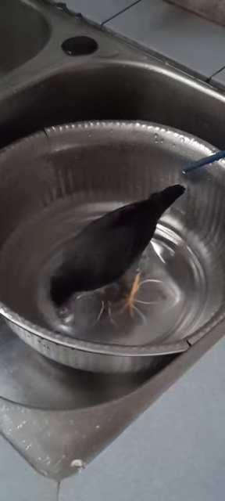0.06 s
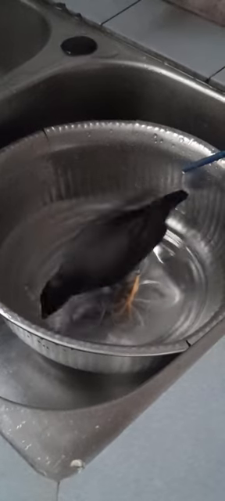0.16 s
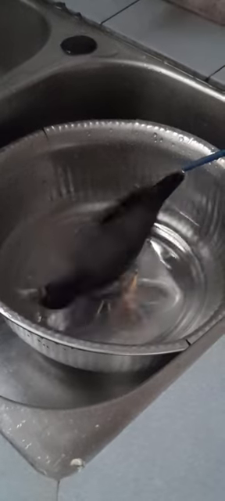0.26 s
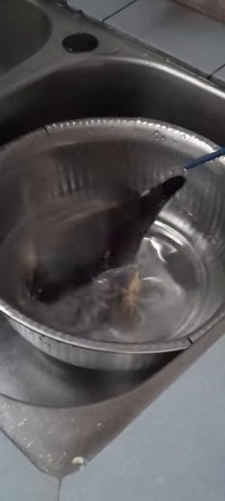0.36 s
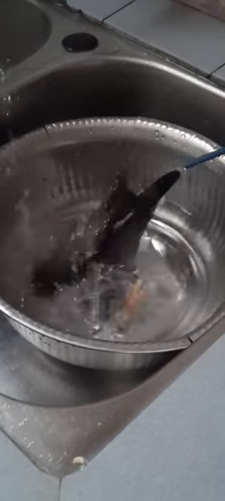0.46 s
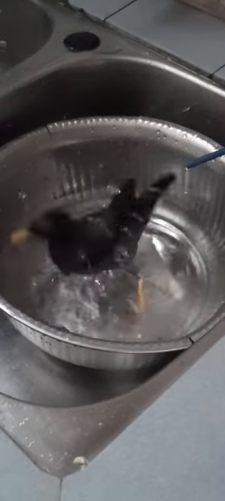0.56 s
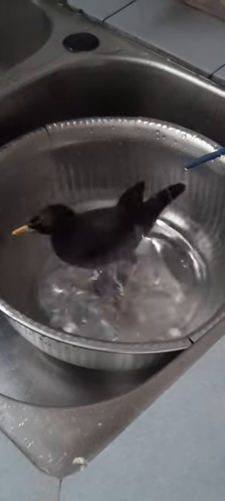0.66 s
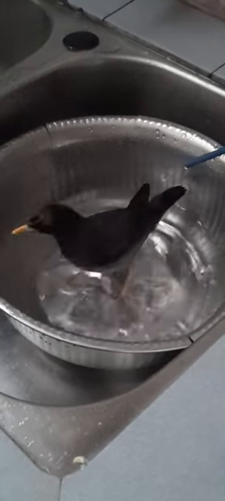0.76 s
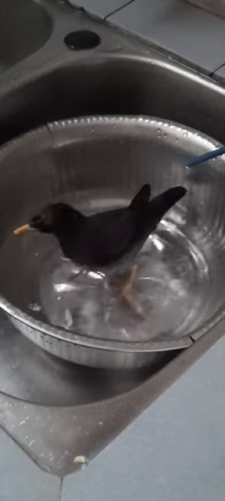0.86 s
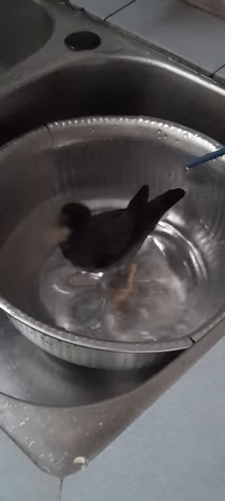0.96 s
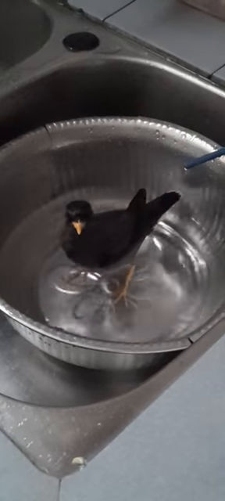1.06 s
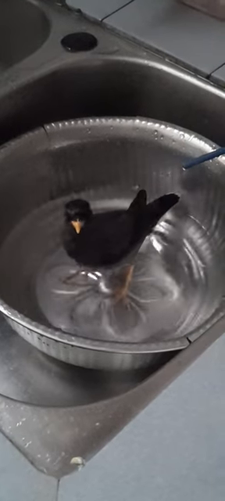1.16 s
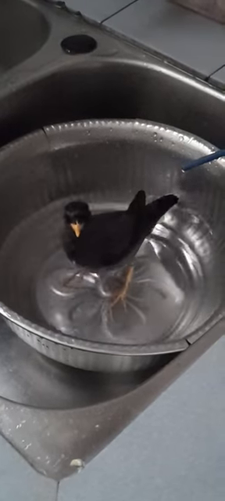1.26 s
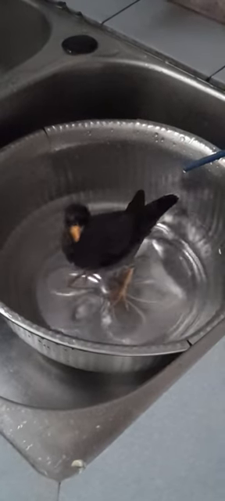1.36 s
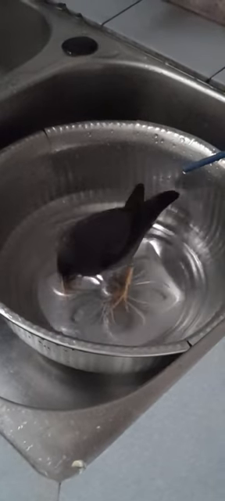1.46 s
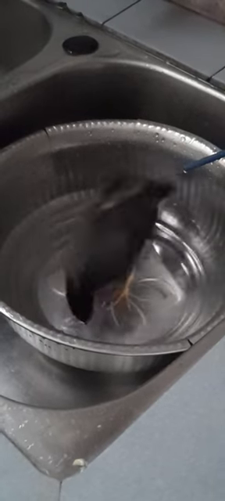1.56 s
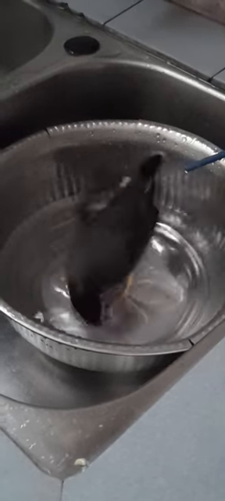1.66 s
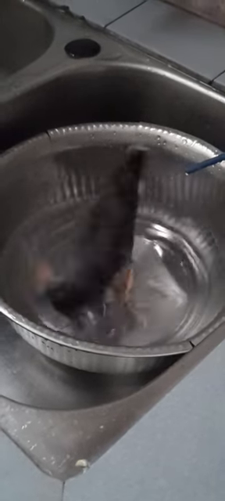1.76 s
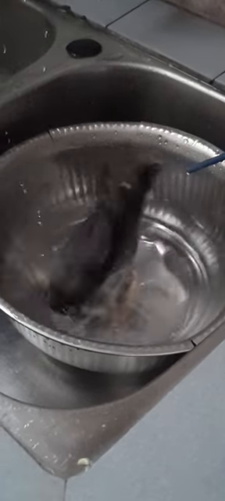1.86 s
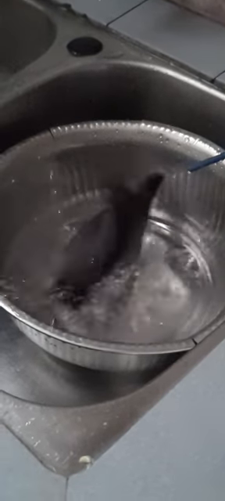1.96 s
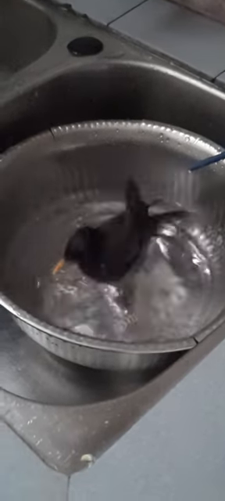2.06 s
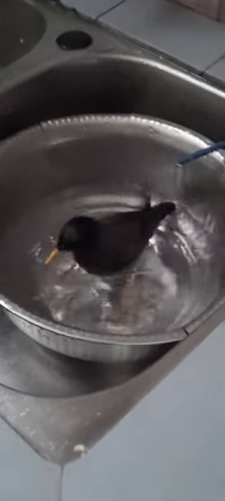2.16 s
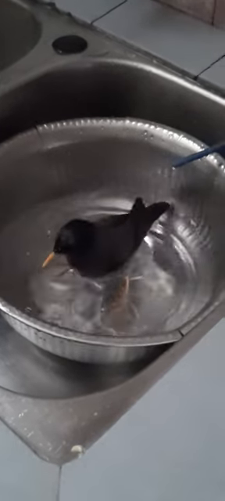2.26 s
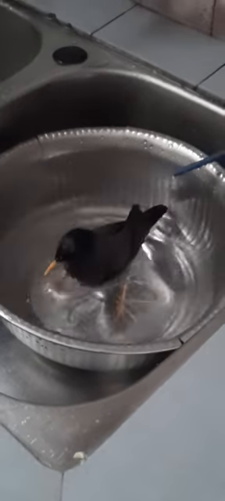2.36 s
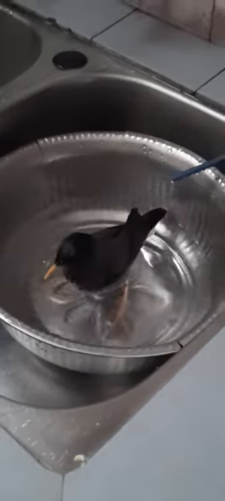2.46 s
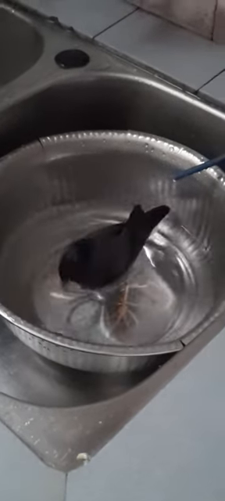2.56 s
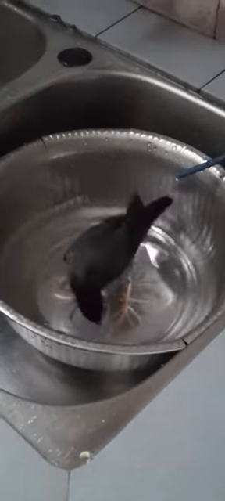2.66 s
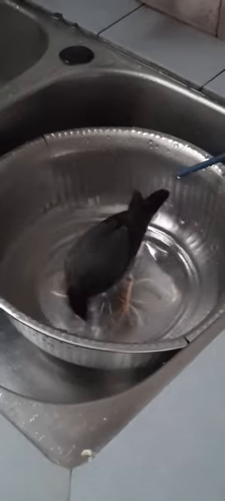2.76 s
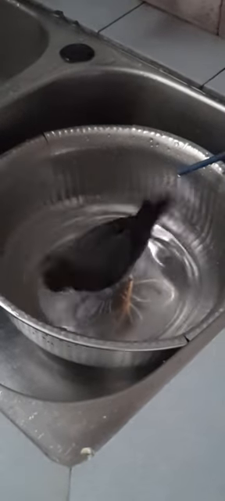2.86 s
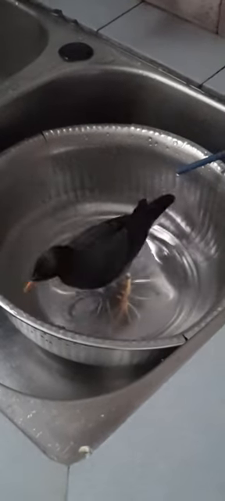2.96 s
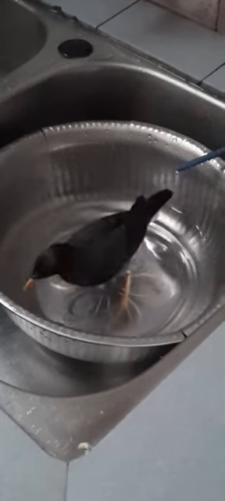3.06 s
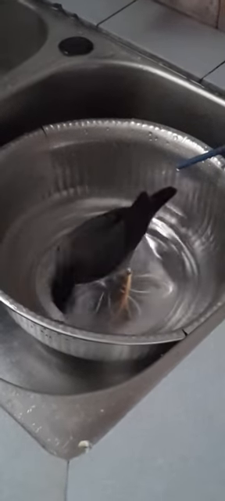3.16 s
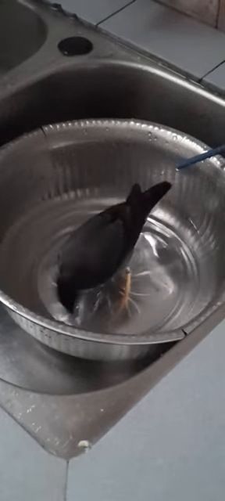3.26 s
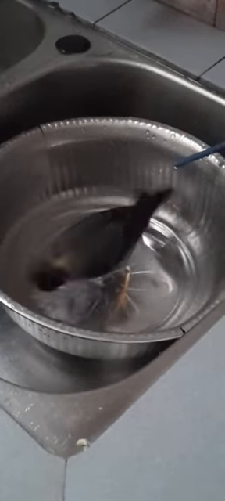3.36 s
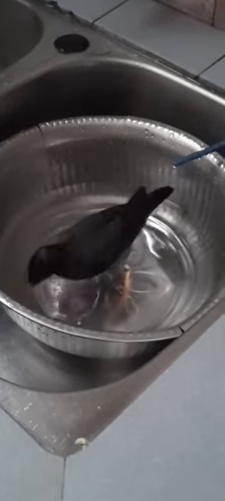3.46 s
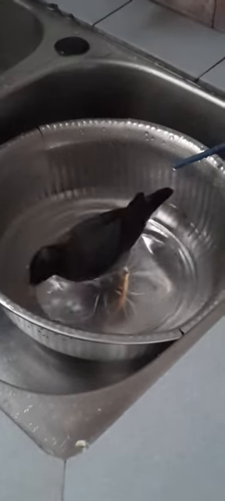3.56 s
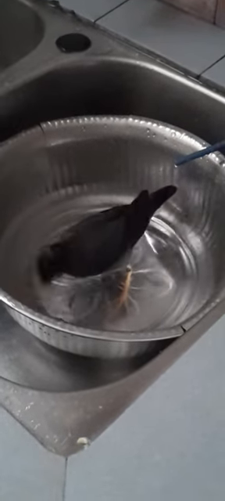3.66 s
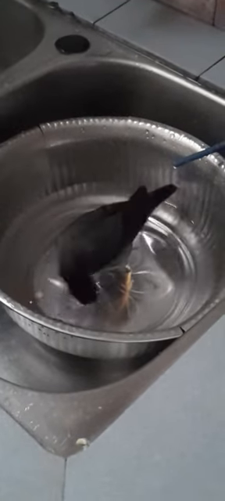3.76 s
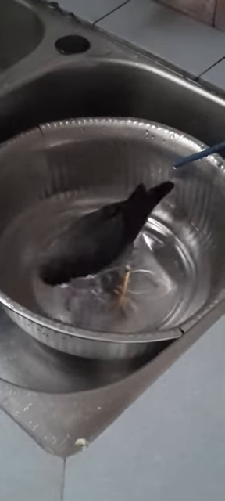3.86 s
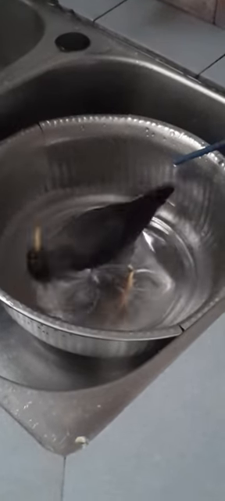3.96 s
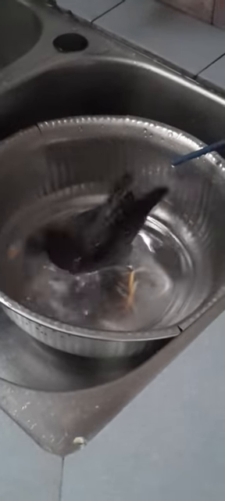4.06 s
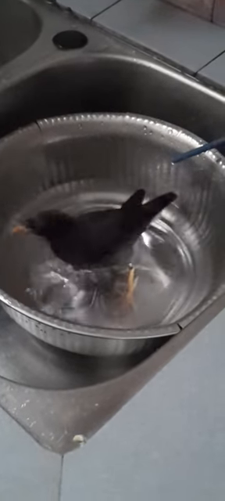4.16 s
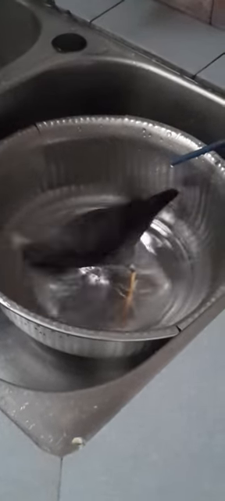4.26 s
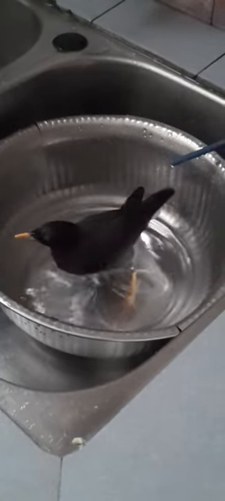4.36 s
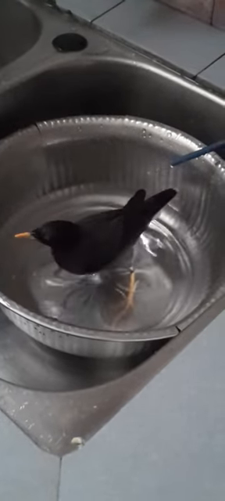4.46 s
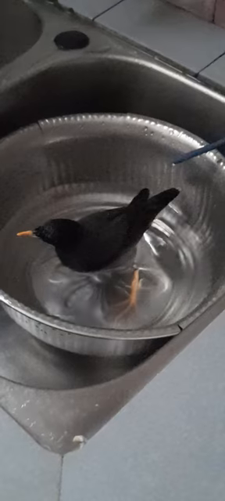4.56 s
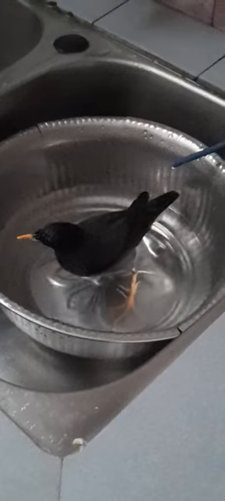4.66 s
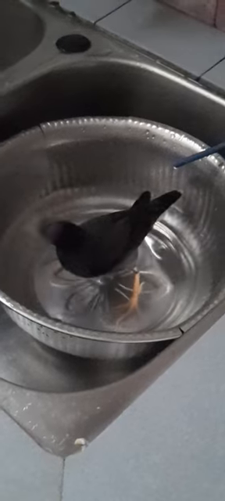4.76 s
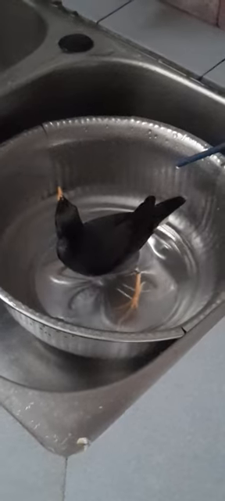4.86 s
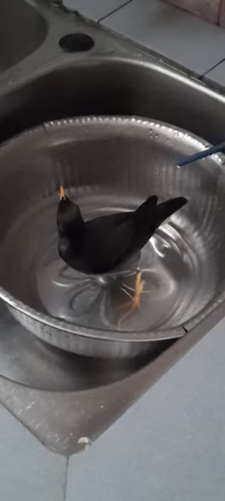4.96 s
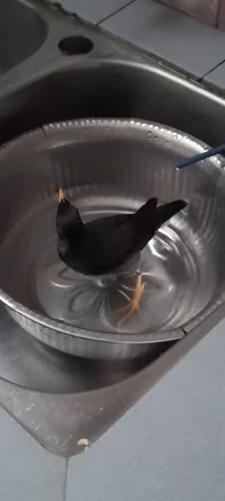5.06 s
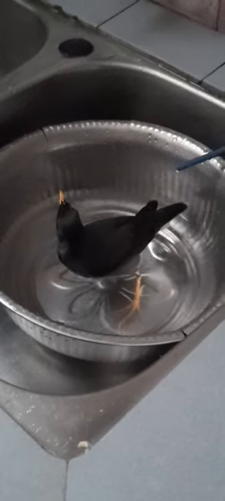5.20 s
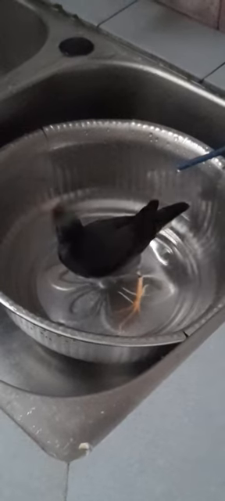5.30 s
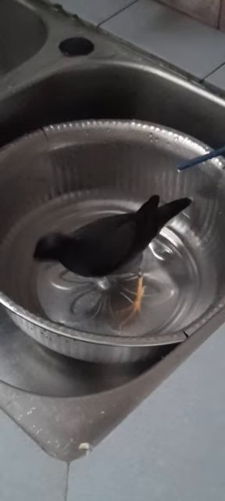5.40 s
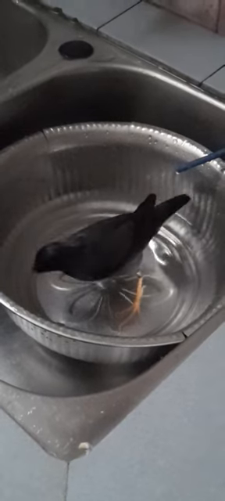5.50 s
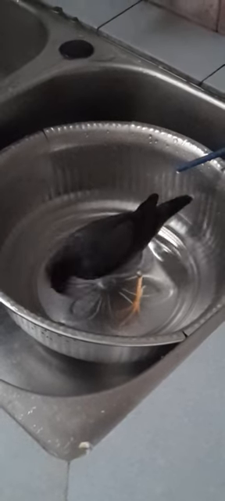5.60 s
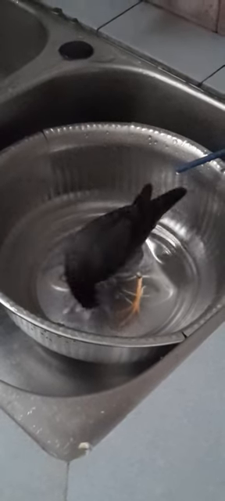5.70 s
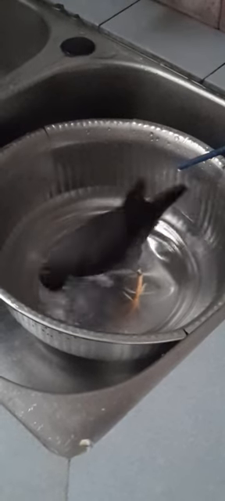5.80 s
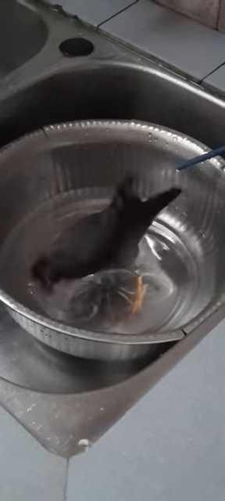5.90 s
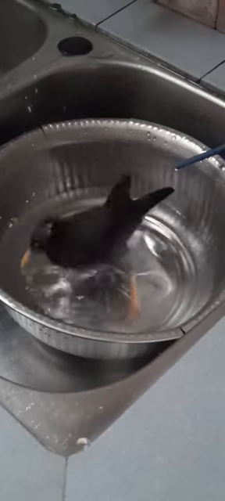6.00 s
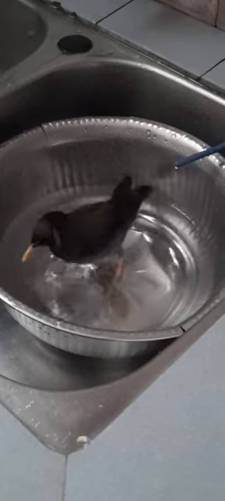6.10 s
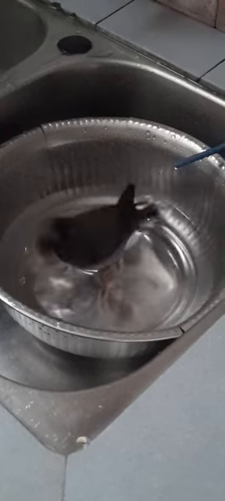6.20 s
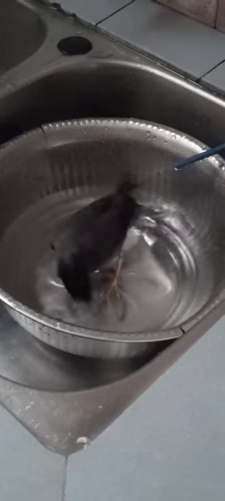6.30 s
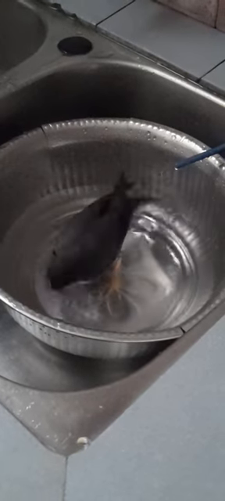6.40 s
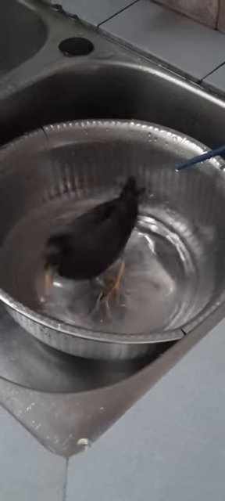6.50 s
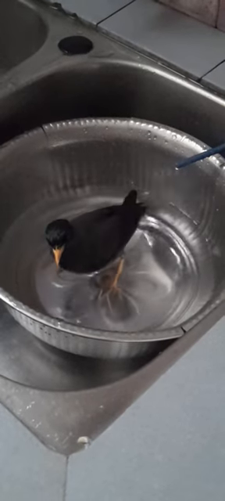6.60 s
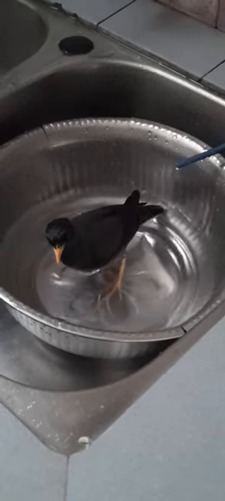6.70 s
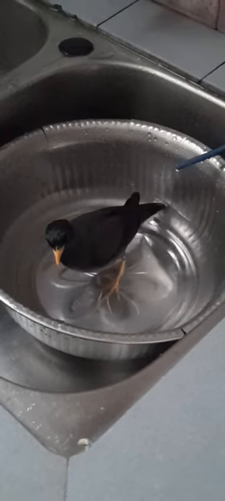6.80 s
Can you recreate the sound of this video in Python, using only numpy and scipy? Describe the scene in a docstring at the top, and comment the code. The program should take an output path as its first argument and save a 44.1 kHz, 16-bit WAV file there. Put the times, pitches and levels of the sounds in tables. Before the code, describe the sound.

A small bird bathes in a metal basin of shallow water, wings slapping in short splashy bursts with spray and gurgles over a faint low hum.

```python
"""A small bird bathes in shallow water in a metal basin in a kitchen sink, heard on two close microphones.
Its wings slap the water about 23 times a second in short bouts: bursts of noise with a ringing cavity.
Low noise puffs are the air they push; damped sines make the spray, the gurgling churn and the plops.
Noise tails rattle in the basin and echo in the tiled kitchen, over wavering hum tones and a rush of air."""
import sys
import numpy as np
from scipy import signal
from scipy.fft import rfft, irfft
from scipy.io import wavfile
from scipy.ndimage import uniform_filter1d

SR = 44100
rng = np.random.default_rng(int(sys.argv[2]) if len(sys.argv) > 2 else 0)


def log_audio(samples):
    """Write samples as a 16-bit WAV file to the path given in sys.argv[1]."""
    # one column per channel
    frames = np.atleast_2d(samples).T
    # limit to full scale, then quantise
    limited = np.clip(frames, -1, 1)
    pcm = np.round(limited * 32767).astype(np.int16)
    wavfile.write(sys.argv[1], SR, pcm)


N = 301644
TIME = np.arange(N) / SR

# mean lag of the splashes at the right microphone (s), and the recorder's upper band edge (Hz)
RIGHT_LAG_S, EDGE_HZ = 0.00009, 16300


def amp(db):
    """Decibels to gain."""
    return 10 ** (np.asarray(db) / 20)


def unit(x):
    """Scales to an rms of one."""
    return x / np.sqrt(np.mean(x ** 2) + 1e-20)


def read(points, hz):
    """Reads a table on a log-frequency axis."""
    f, value = np.transpose(points)
    return np.interp(np.log(hz + 1), np.log(f + 1), value)


def add(mix, s, sound):
    """Mixes a sound in at a given time in seconds."""
    part = mix[max(round(s * SR), 0):][:len(sound)]
    part += sound[:len(part)]


def drift(rate_hz):
    """Slow random motion of rms one."""
    hz = np.fft.rfftfreq(N, 1 / SR)
    return unit(irfft(rfft(rng.standard_normal(N)) * np.exp(-(hz / rate_hz) ** 2), N))


def colour(x, points, size=4096):
    """Causal (minimum-phase) filter of unit energy with the given spectrum."""
    log_gain = np.log(amp(read(points, abs(np.fft.fftfreq(size, 1 / SR)))))
    taps = np.fft.ifft(np.exp(np.conj(signal.hilbert(log_gain)))).real
    return signal.oaconvolve(x, taps / np.linalg.norm(taps))[:N]


# Likeness of the two microphones. Each row: frequency in Hz, correlation.
MIC_LIKENESS = [(30,0.46),(90,0.73),(200,0.94),(400,0.62),(900,0.052)]


def pair(x):
    """Makes two unrelated channels alike in the bass, as at two close microphones."""
    spectra, hz = rfft(x), np.fft.rfftfreq(x.shape[1], 1 / SR)
    angle = np.arcsin(np.clip(read(MIC_LIKENESS, hz), -1, 1)) / 2
    return irfft(spectra * np.cos(angle) + spectra[::-1] * np.sin(angle), x.shape[1])


def stereo(source):
    """Two draws of a random source, made alike in the bass."""
    return pair(np.array([source(), source()]))


# Spectrum of the rush of air. Each row: frequency in Hz, relative density in dB per Hz.
RUSH_COLOUR = [(20,-34),(55,-1.5),(90,1),(120,3),(200,-10),(320,0),(440,-10),(680,-13.5),(1200,-21),(3200,-37.5),(6000,-32),(8500,-39),(12500,-35),(16000,-38.5)]
# Lean of the rush across the microphones. Each row: frequency in Hz, left minus right in dB.
RUSH_LEAN = [(100,0.5),(300,-2.5),(700,-0.5),(2000,0)]
# Appliance hum. Each row: frequency in Hz, relative level in dB, left minus right in dB, waver share.
HUM_TONES = [(100.3,-58.5,3.5,0.092),(111.9,-62,3,0.91),(145.9,-62.5,-4.5,0.59),(580.2,-68,-1.5,0.01)]
# Rough level line of the lowest hum tone, which wavers in strength. Each row: time in seconds, gain in dB.
DEEP_TONE_LEVEL = [(.9,8),(.98,-4),(1.06,3.5),(1.35,8.5),(1.43,-6),(1.53,7.5)]


def background(floor_db, waver_hz):
    """An appliance hums with wavering tones in a soft rush of air."""
    hz = np.fft.rfftfreq(N, 1 / SR)
    sides = np.array([[.5], [-.5]])
    rush_gain = amp(read(RUSH_COLOUR, hz) + sides * read(RUSH_LEAN, hz))
    noise = stereo(lambda: rng.standard_normal(N))
    rush = amp(floor_db) * unit(irfft(rfft(noise) * rush_gain, N))
    tones = []
    for tone_hz, db, lean_db, waver in HUM_TONES:
        swing = unit(abs(1 + waver * drift(waver_hz)))
        tone = unit(np.sin(2 * np.pi * tone_hz * TIME + waver * drift(waver_hz)))
        tones.append(amp(db + sides * lean_db) * swing * tone)
    deep_gain = amp(np.interp(TIME, *np.transpose(DEEP_TONE_LEVEL)))
    return rush + tones[0] * deep_gain + sum(tones[1:])


# Wings hitting the water. Each row: time in seconds, relative slap level in dB, relative treble share in dB,
# relative level of the pushed air in dB, decay time in seconds, ring of the cavity in Hz.
WINGBEATS = [(0.3718, -33, 2, -41.5, 0.0021, 3650), (0.4171, -38, 4, -44.5, 0.0038, 10900),
             (0.4217, -31, -10, -42, 0.0027, 6700), (0.4578, -24.5, -2.5, -52, 0.002, 2060),
             (0.4993, -38, 4, -42, 0.0076, 5850), (1.832, -27.5, 6.5, -38, 0.00043, 5170),
             (1.8337, -23, 1, -53, 0.00061, 4800), (1.8717, -24.5, -3, -41.5, 0.0027, 4330),
             (1.9197, -28, 2, -52, 0.00075, 11500), (1.9607, -21, -5.5, -40.5, 0.0012, 6050),
             (5.888, -46, 5.5, -43.5, 0.0025, 12200), (5.9216, -37, 0, -57, 0.0035, 2600),
             (5.9272, -33.5, 3.5, -65, 0.0019, 13500)]
# Beak, head and feathers flicking through the water.
# Each row: time in seconds, relative level in dB, relative treble share in dB, decay time in seconds.
FLICKS = [(0.124, -39, -29, 0.0053), (0.167, -35.5, -14, 0.0047), (0.3105, -45, -7.5, .005),
          (.333, -43, -8, 0.0035), (.721, -48.5, -1.5, 0.0074), (1.801, -47.5, 2, 0.0025),
          (1.9105, -47, 14, 0.0027), (1.927, -31.5, -23, 0.0024), (3.373, -52.5, -2, 0.0036),
          (3.387, -53, 0, 0.0043), (3.427, -49, 1, 0.005), (3.4739, -44, -4, 0.0026),
          (3.923, -60, 8, 0.0052), (3.977, -46.5, 0, 0.0053), (4.0298, -42.5, -3, 0.0019),
          (4.0659, -45, 3.5, .0032), (4.08, -45, -7, 0.0022), (4.238, -47.5, -2.5, 0.0024),
          (4.349, -58.5, -3, .006), (5.787, -59, 6, 0.0031), (6.122, -49, 8, 0.005),
          (6.144, -46.5, 1.5, 0.0065), (6.2923, -57, 6.5, 0.002)]
# Single drops ticking on the basin and the water.
# Each row: time in seconds, relative level in dB, relative treble share in dB.
DRIPS = [(.643, -42, 9), (0.676, -48, 13), (1.0277, -67, 21), (1.895, -41, 2), (1.993, -37, -13),
         (2.609, -52, 12.5), (2.876, -51.5, 5.5), (6.3655, -49.5, 4), (6.445, -54, 10)]


def impacts(drip_decay_s=0.00077):
    """All impacts as (s, dB, treble dB, decay s, ring Hz); only wings open a ringing cavity."""
    beats = [(s, db, treble, decay, ring) for s, db, treble, _, decay, ring in WINGBEATS]
    flicks = [(*row, None) for row in FLICKS]
    drips = [(s, db, treble, drip_decay_s, None) for s, db, treble in DRIPS]
    return beats + flicks + drips


# Spectrum shared by all impacts. Each row: frequency in Hz, relative density in dB per Hz.
SLAP_COLOUR = [(300,-35),(800,-17),(1050,-12.5),(1400,-3),(2050,5),(3100,-4.5),(4100,3.5),(5200,4),(7200,7),(8400,-3),(12500,1.5),(16000,-8)]


def slaps(gain_db, treble_db, split_hz, grain_db, rattle_db, rattle_s, lumps_db, lump_hz,
          ring_db, ring_octaves, rise_share=0.25, size=5000):
    """Each stroke is a sharp cluster of water impacts, which rattles on between the basin walls."""
    out, t, hz = np.zeros((2, N)), TIME[:size], np.fft.rfftfreq(size, 1 / SR)
    treble = 1 / (1 + (split_hz / (hz + 1)) ** 10)
    knots = np.arange(0, SR / 2, lump_hz)
    for s, db, bright_db, decay, ring_hz in impacts():
        shape = np.exp(-t / decay) * (1 - np.exp(-t / (decay * rise_share)))
        lumps, hiss, ragged = rng.standard_normal((3, size))
        # a wing's cavity has one broad ring; every impact has many small resonances
        ring = np.exp(-(np.log2((knots + 1) / ring_hz) / ring_octaves) ** 2) if ring_hz else 0
        cavity = np.column_stack([knots, ring_db * ring + lumps_db * lumps[:len(knots)]])
        # impacts come in clumps a fraction of a millisecond long
        clumps = amp(grain_db * unit(uniform_filter1d(ragged, size=16)))
        crack = unit(hiss * clumps * shape)
        tilt_db = (bright_db + treble_db) * treble
        tilt = np.column_stack([hz, tilt_db])
        # crack and filter have unit energy, so the level restores that of the shape and the tilt
        level = amp(db + gain_db) * np.sqrt(np.mean(shape ** 2) * np.mean(amp(tilt_db) ** 2))
        # strokes land all over the basin, so the lag between the microphones varies
        for channel, lag in zip(out, (0, RIGHT_LAG_S * 2 * rng.random())):
            rattle_shape = np.exp(-t / rattle_s) * (1 - np.exp(-t / decay))
            rattle = unit(rng.standard_normal(size) * rattle_shape)
            ringing = colour(crack + amp(rattle_db) * rattle, cavity)[:size]
            add(channel, s + lag, level * colour(ringing, tilt))
    return pair(np.array([colour(channel, SLAP_COLOUR) for channel in out]))


def bubble(hz, decay, rise):
    """A damped sine whose pitch rises as the bubble nears the surface."""
    t = np.arange(0, 10 * max(decay, 1 / SR), 1 / SR)
    pitch = hz * (1 + rise * (np.tanh(t / decay / 2) - .5))
    fade = np.exp(-t / decay) * (1 - np.exp(-t * hz))
    return np.sin(2 * np.pi * np.cumsum(pitch) / SR) * fade


# The largest air pockets, ringing as the water closes over them.
# Each row: time in seconds, relative level in dB, pitch in Hz, decay time in seconds.
BUBBLES = [(.155, -44.5, 1990, .003), (.418, -32, 1474, 0.0037), (0.4226, -27, 1380, 0.0036),
           (0.452, -35.5, 200.5, 0.033), (0.498, -34, 1700, 0.0023), (0.522, -34.5, 4115, 0.014),
           (0.551, -37, 1490, 0.0039), (.556, -29.5, 1315, 0.0045), (.607, -40.5, 2900, 0.0051),
           (.901, -45.5, 817, 0.0046), (.918, -51, 740, .009), (1.876, -31, 4030, .003),
           (1.969, -26.5, 1975, 0.0035), (1.981, -33.5, 1610, 0.004), (1.994, -30, 2044, 0.0052),
           (2.057, -27.5, 2110, 0.0035), (2.058, -35, 2910, 0.0028), (2.262, -47, 777, 0.0086),
           (3.475, -48, 2020, 0.0029), (4.065, -35.5, 2020, 0.0027), (4.289, -51, 2250, 0.016),
           (5.921, -33.5, 950, .0016), (5.922, -24.5, 1675, 0.0014), (5.963, -46, 2026, .007),
           (6.266, -52, 2890, 0.0039), (6.135, -44.5, 1420, 0.02), (6.146, -39.5, 1620, 0.0078),
           (6.172, -47.5, 1570, 0.025), (6.3048, -41.5, 1618, .006), (6.308, -40.5, 1403, 0.014),
           (6.315, -51.5, 1052, 0.026)]


def plops(gain_db, rise, shard_db, scatter, linger, shard_s, count=8):
    """Each large bubble rings and sheds short-lived shards of nearby pitch."""
    out = np.zeros((2, N))
    for s, db, hz, decay in BUBBLES:
        for channel, lag in zip(out, (0, RIGHT_LAG_S)):
            add(channel, s + lag, amp(db + gain_db) * bubble(hz, decay, rise))
            for late, detune in rng.random((count, 2)):
                shard_hz = hz * np.exp(scatter * (2 * detune - 1))
                shard = bubble(shard_hz, min(decay / 2, shard_s), rise)
                level = amp(db + gain_db + shard_db) * np.exp(-late)
                add(channel, s + late * linger * decay, level * shard)
    return out


# Spectrum of the pushed air. Each row: frequency in Hz, relative density in dB per Hz.
PUFF_COLOUR = [(20,-26),(55,-4.5),(90,5.5),(140,-3),(480,-12),(800,-20),(1600,-40)]


def wing_puffs(gain_db, swell_s, fade_s):
    """Each wing beat pushes a low puff of air that swells into the slap and fades after it."""
    puffs = sum(amp(db) * np.exp(-np.maximum((s - TIME) / swell_s, (TIME - s) / fade_s))
                for s, _, _, db, _, _ in WINGBEATS)
    return amp(gain_db) * puffs * stereo(lambda: colour(rng.standard_normal(N), PUFF_COLOUR))


def droplets(per_s, low_hz, high_hz, cycles, spread_db, count=36):
    """A steady rain of tiny bubbles of many sizes, rms one."""
    chance, kind = rng.random(N), rng.integers(0, count, N)
    size = np.minimum(rng.exponential(1, N), np.pi)
    grains = [bubble(hz, cycles * rng.uniform(0.74, 2.85) / hz, 0.088)
              for hz in np.geomspace(low_hz, high_hz, count)]
    out = np.zeros(N)
    for i in np.flatnonzero(chance < per_s / SR):
        grain = grains[kind[i]]
        add(out, i / SR, amp(spread_db * size[i]) * grain / len(grain))
    return unit(out)


def surge(start, crest, t60, depth_db, bend, trickle_db, trickle_db_per_s):
    """Gain over one bout: the water builds up to a crest, falls back quickly and trickles on."""
    progress = np.clip((TIME - start) / (crest - start), 0, 1)
    after = np.maximum(TIME - crest, 0)
    fall = np.exp(-np.log(1000) * after / t60)
    settling = np.maximum(fall, amp(trickle_db - trickle_db_per_s * after))
    build_up = amp(depth_db * (progress ** bend - 1))
    return uniform_filter1d((TIME > start) * build_up * settling, size=600)


# Bouts of bathing, for the spray and the churn. Each row: start in seconds, crest of the spray in seconds,
# settling t60 of the spray in seconds, relative spray level in dB, relative churn level in dB.
BOUTS = [(0.348, 0.519, 0.38, -39, -45), (0.68, 0.7, 0.12, -54, -60), (1.773, 1.991, 0.41, -37, -46.5),
         (3.337, 3.462, 0.93, -75, -53.5), (3.896, 4.036, 0.19, -47.5, -52),
         (4.22, 4.268, 0.41, -57.5, -61), (5.805, 5.91, 0.15, -40, -50), (6.273, 6.31, 0.11, -58, -54),
         (6.39, 6.462, 0.3, -58.5, -73)]
# Spectrum of the spray. Each row: frequency in Hz, relative density in dB per Hz.
SPRAY_COLOUR = [(800,-52),(2000,12.5),(2900,3),(4100,7),(5200,9.5),(6600,8),(8400,4),(12000,13.5),(16000,7)]


def spray(gain_db, tinkle_db):
    """Flung drops tick on the water and the basin wall; some trap a tiny bubble that tinkles."""
    ticks = droplets(per_s=910, low_hz=2510, high_hz=15700, cycles=3.8, spread_db=2.8)
    tinkles = droplets(per_s=220, low_hz=2205, high_hz=8760, cycles=14.8, spread_db=3.5)
    thrown = sum(amp(db) * surge(start, crest, t60, depth_db=17.5, bend=6.6,
                                 trickle_db=-16, trickle_db_per_s=44.5)
                 for start, crest, t60, db, _ in BOUTS)
    return amp(gain_db) * thrown * unit(colour(ticks + amp(tinkle_db) * tinkles, SPRAY_COLOUR))


# Spectrum of the churn. Each row: frequency in Hz, relative density in dB per Hz.
CHURN_COLOUR = [(200,-52),(400,5.5),(650,4.5),(1050,-3.5),(1450,-0.5),(2100,-1),(2800,-15),(4500,-30)]


def churn(gain_db, lag_s, linger):
    """Stirred water gurgles with mid-sized bubbles; it crests after the spray and settles more slowly."""
    gurgle = droplets(per_s=800, low_hz=450.9, high_hz=3093, cycles=12, spread_db=2.5)
    stirred = sum(amp(db) * surge(start, crest + lag_s, t60 * linger, depth_db=21, bend=0.52,
                                  trickle_db=-13.0, trickle_db_per_s=28.0)
                  for start, crest, t60, _, db in BOUTS)
    return amp(gain_db) * stirred * unit(colour(gurgle, CHURN_COLOUR))


# Echo of the tiled kitchen. Each row: frequency in Hz, t60 in seconds.
KITCHEN_T60 = [(200,0.25),(1400,0.24),(3500,0.3),(9000,0.24),(16000,0.22)]


def kitchen(x, room_db, dull_db, change_s=0.033, size=22050, count=4):
    """Adds the dulled noise tail of a small tiled room; the echoes change as the bird moves about."""
    out = x
    for turn in range(count):
        hz, when, z = signal.stft(stereo(lambda: rng.standard_normal(size)), SR, nperseg=256)
        z = z * amp(dull_db * hz / EDGE_HZ)[:, None]
        decay = np.exp(-np.log(1000) * when / read(KITCHEN_T60, hz)[:, None])
        tail = signal.istft(z * decay, SR)[1][:, :size]
        # the tails take turns, each crossfading into the next
        away = abs((TIME / change_s + turn) % count - count / 2)
        share = np.cos(np.pi / 2 * np.minimum(away, 1))
        echo = signal.oaconvolve(x * share, tail / np.linalg.norm(tail[0]), axes=1)[:, :N]
        out = out + amp(room_db) * echo
    return out


def scene():
    """The splashes in their basin and room, the puffs of the wings and the hum."""
    water = slaps(gain_db=4.0, treble_db=4.0, split_hz=7240, grain_db=4.5, rattle_db=-9, rattle_s=0.0072,
                  lumps_db=3.5, lump_hz=331.4, ring_db=7, ring_octaves=0.25)
    # thrown water comes down in uneven showers
    showers = amp(2 * drift(rate_hz=70))
    water = water + stereo(lambda: showers * spray(gain_db=-4.0, tinkle_db=1.5)
                           + churn(gain_db=-4.0, lag_s=0.04, linger=1.07))
    water = water + plops(gain_db=0.5, rise=0.017, shard_db=-6, scatter=0.387, linger=2.8, shard_s=0.0025)
    # the water is 1 dB stronger at the left microphone
    wet = kitchen(water, room_db=-2.5, dull_db=-1.5) * amp([[.5], [-.5]])
    puffs = wing_puffs(gain_db=-7.0, swell_s=0.013, fade_s=0.071)
    return wet + puffs + background(floor_db=-54.0, waver_hz=5.7)


def record(dry):
    """The recorder's band limit, a steep low-pass."""
    low_pass = signal.firwin(255, EDGE_HZ, window=("kaiser", 9), fs=SR)
    return signal.oaconvolve(dry, low_pass[None], "same")


dry = scene()
out = record(dry)
log_audio(out)
```